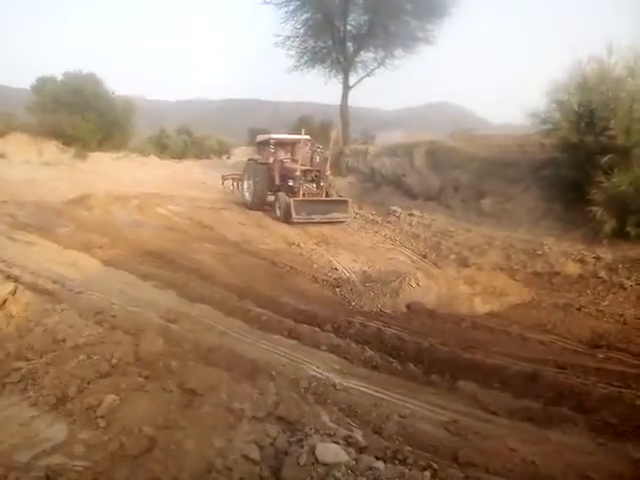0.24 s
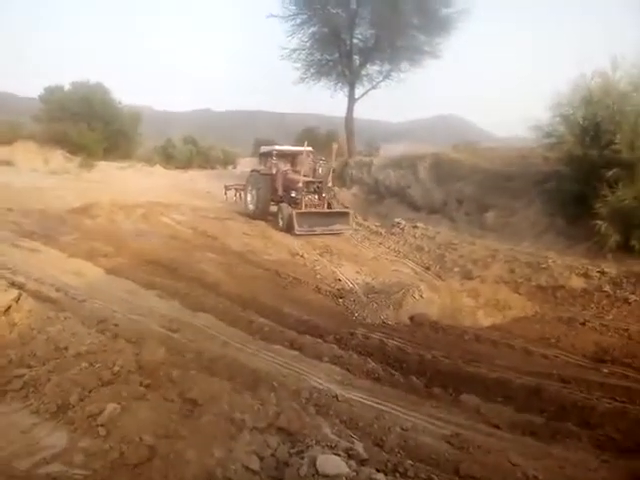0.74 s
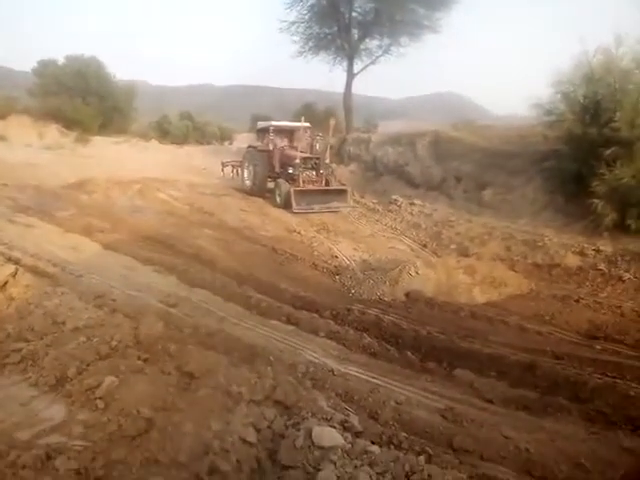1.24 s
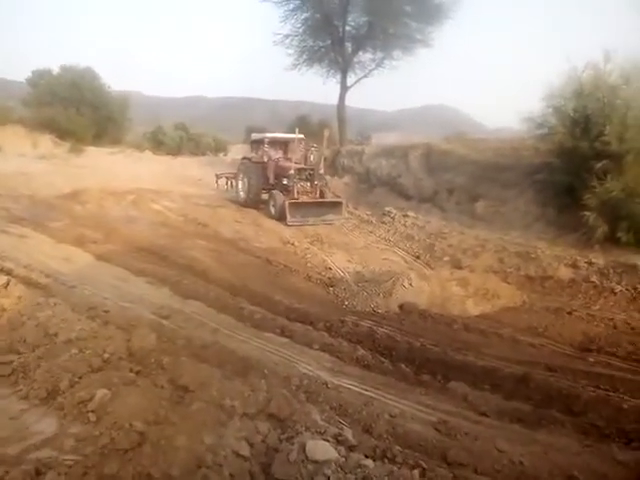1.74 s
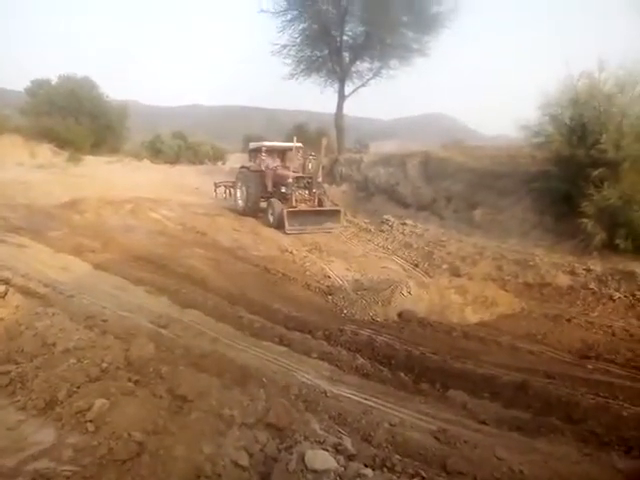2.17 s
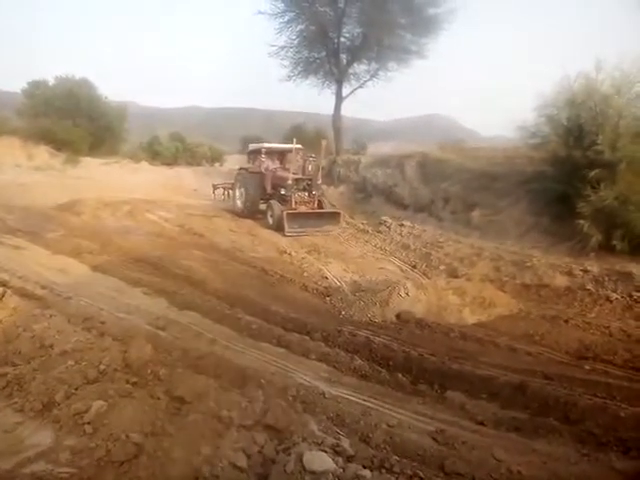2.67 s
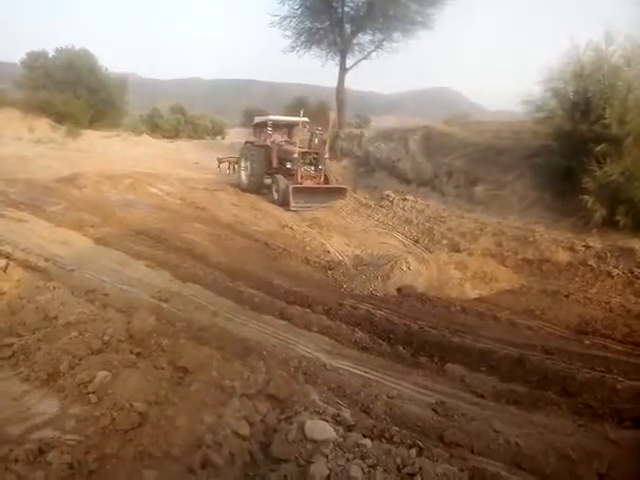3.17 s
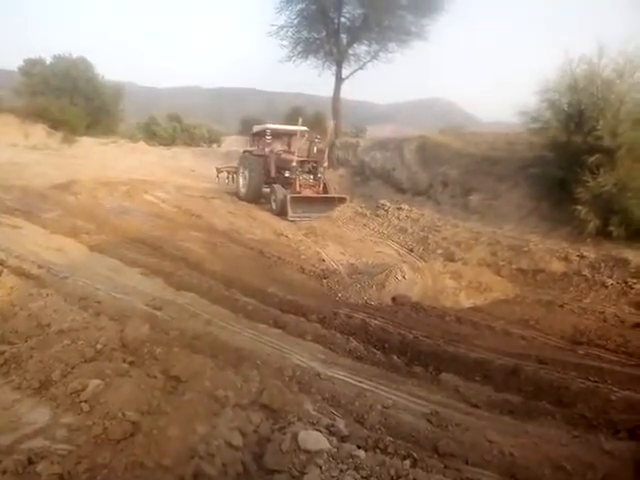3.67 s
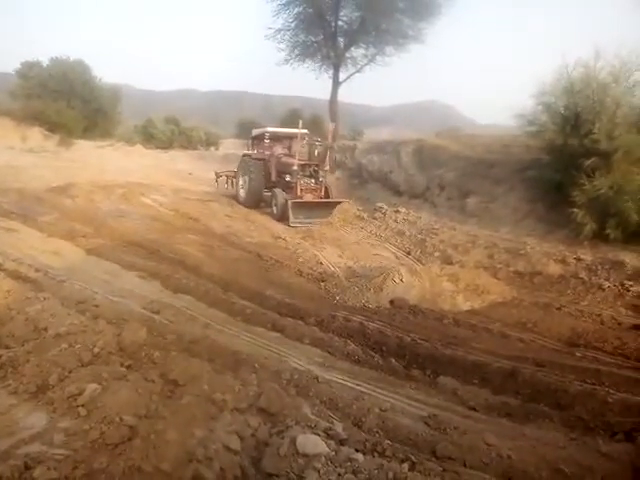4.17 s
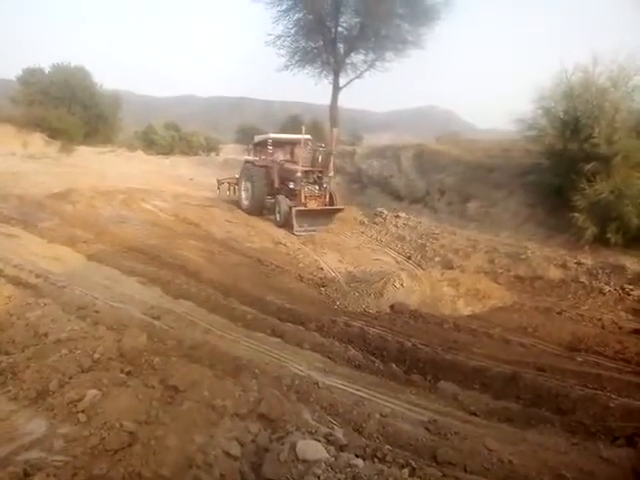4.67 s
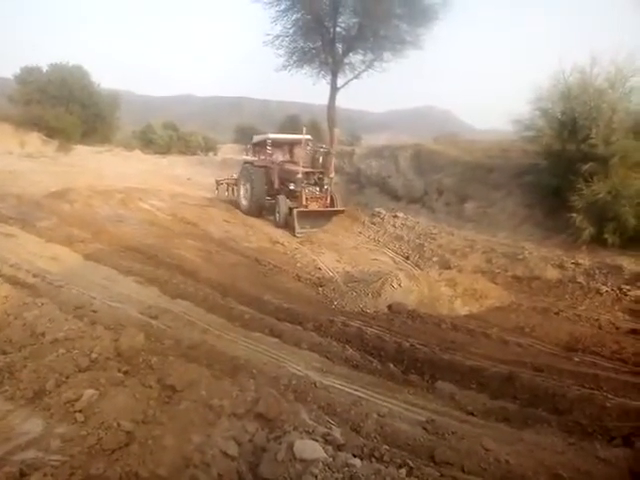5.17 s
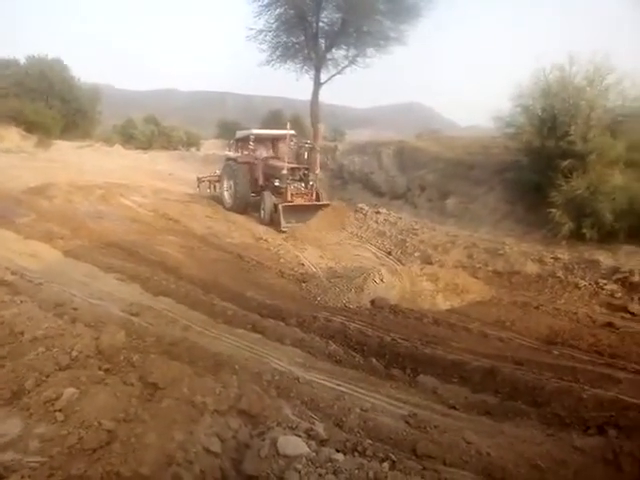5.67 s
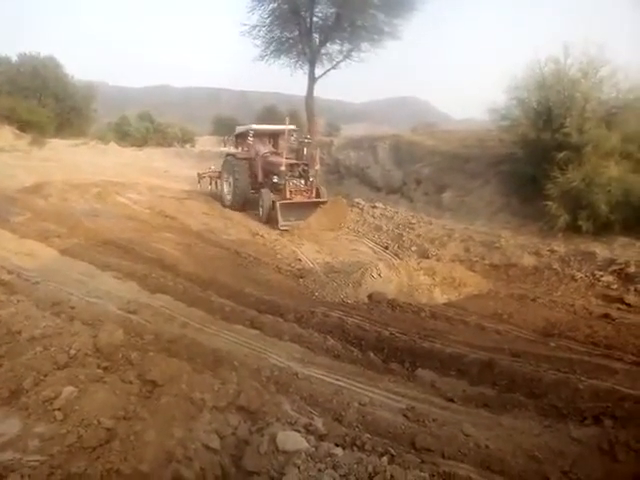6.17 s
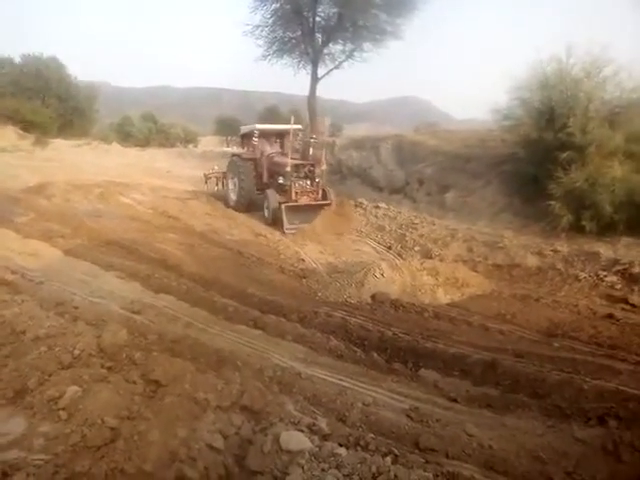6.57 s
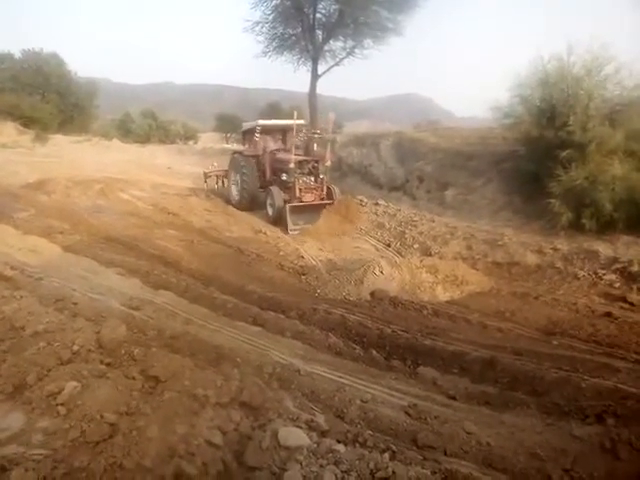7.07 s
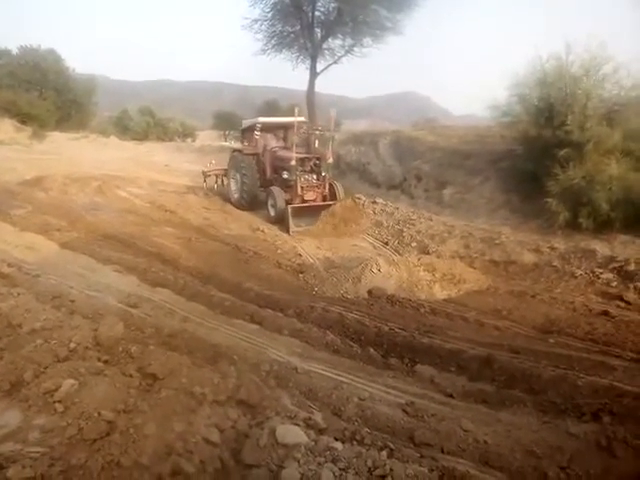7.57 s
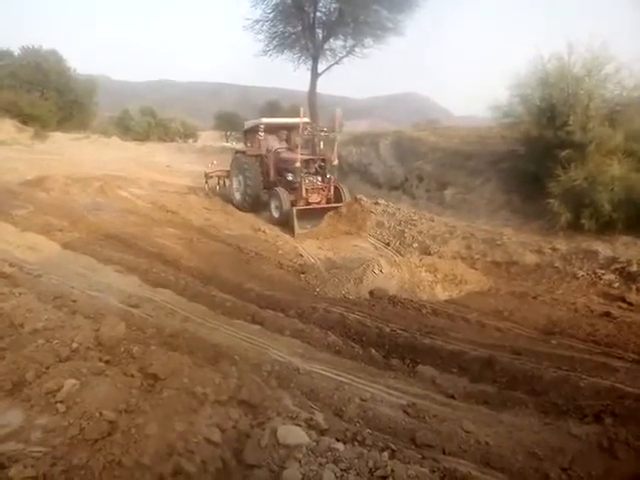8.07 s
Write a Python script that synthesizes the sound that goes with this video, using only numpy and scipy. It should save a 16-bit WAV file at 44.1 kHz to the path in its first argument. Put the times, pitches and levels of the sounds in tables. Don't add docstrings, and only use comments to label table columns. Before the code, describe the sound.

Outdoors in a dry field, a phone microphone hears a tractor's diesel engine throughout: rapid knocking, bright steely clatter, low exhaust boom and thin injector hiss. Revs sag early, recover, then climb in the second half as the machine edges closer and louder. A stone cracks and scrapes near one second; later, scattered linkage clanks, sharp cracks and loose rattling accompany the loaded blade.

```python
import sys
import numpy as np
from scipy import signal
from scipy.fft import rfft, irfft, next_fast_len
from scipy.io import wavfile
from scipy.ndimage import uniform_filter1d

SR = 44100
rng = np.random.default_rng(int(sys.argv[2]) if len(sys.argv) > 2 else 0)


def file_out(sig):
    cols = np.atleast_2d(sig).T
    lim = np.clip(cols, -1, 1)
    pcm = np.round(lim * 32767).astype(np.int16)
    wavfile.write(sys.argv[1], SR, pcm)


def gain_from_db(level_db):
    decades = np.asarray(level_db, float) / 20
    return 10 ** decades


N = 366912

# time_s, firing_rate_hz
FIRING_RATE = [(0.0, 37.42), (0.59, 32.77), (1.31, 28.68), (1.54, 28.94), (2.44, 34.96), (2.89, 31.77),
               (3.52, 32.98), (4.21, 39.2), (4.5, 40.2), (5.0, 37.65), (5.21, 37.92), (5.73, 36.65),
               (6.06, 40.48), (6.52, 40.5), (6.73, 42.33), (7.21, 41.88), (7.52, 43.62), (8.32, 41.83)]
# time_s, block_level_db
BLOCK_LEVEL = [(0, -46.5), (.35, -48.5), (.65, -50.5), (1.2, -50), (1.6, -48), (2.2, -47.5), (2.8, -48.5),
               (3.4, -48), (3.8, -46), (4.1, -43.5), (4.5, -44.5), (5.1, -43), (5.9, -43.5), (6.3, -44.5),
               (6.7, -43), (7.2, -42.5), (7.6, -42), (8.32, -41.5)]
# freq_hz, density_db
BODY = [(15, -17), (45, -23.5), (110, -17), (210, -6), (290, -7), (380, -8.5), (470, -12.5), (680, -7.5),
        (1000, -12), (1180, -8), (1750, -5), (2000, 0), (2600, -5.5), (3400, -13.5)]
# freq_hz, density_db
TREBLE = [(1650, -55), (2800, -4), (3250, -13), (3690, -10), (4050, -10.5), (4710, -8), (5340, 1),
          (5570, 3), (6360, -8), (7820, -30), (9310, -43), (12500, -42), (16200, -66), (22000, -120)]
# freq_hz, t60_s, level_db
BLOCK_MODES = [(1110, .04, -9), (1175, .07, -4), (1235, .05, -5), (1450, .04, -9), (1670, .045, -5),
               (1980, .05, 1.5), (2150, .05, 1.5), (2500, .03, -5), (2900, .03, -8), (5300, .025, -6),
               (5550, .03, -5), (5800, .025, -7)]
# freq_hz, gain_db
CASTING = [(900, 0), (6000, 0), (9000, -25)]
CYLINDERS_DB = [-0.9, 0.6, -0.18, 0.35]
# freq_hz, density_db
TICK_BAND = [(7000, 0), (11000, -10)]
# freq_hz, level_db
SILENCER = [(29, -54), (37, -35), (57, -26.5), (68, -14.5), (77, -19), (90, -20), (106, -24.5),
            (128, -19.5)]
ORDERS_DB = [-1, -0.1, 0.2, -7.5]
# freq_hz, t60_s, level_db
STACK_MODES = [(260, .07, -2), (330, .08, -6), (435, .1, -2), (550, .14, -2.5), (680, .12, -3),
               (850, .1, -2)]
# place_turns, pitch_hz, length_turns, level_db (re block)
VALVE_POPS = [
    (2.29, 515, .17, -3.8),
    (.27, 190, .2, -11),
    (1.22, 1200, .1, -11),
]
# freq_hz, density_db
SPRAY = [(11000, -26), (12800, -19), (13550, -10), (13900, -13), (14600, -1), (14800, 0), (15000, -1),
         (15600, 0)]
SPRAY_EDGES_HZ = [12000, 13300, 13800, 14400, 14900, 15250, 20000]
# middle_s, half_length_s, extra_db
THROTTLE = [
    (.35, 0.31, 3),
    (4.35, 0.7, 3.5),
    (5.9, .25, 2.5),
]
# middle_s, half_length_s, level_db
FAN_SPELLS = [
    (.05, 0.19, -62.5),
    (.7, .2, -69),
    (2.6, 0.22, -69),
    (4.2, 0.36, -70),
    (5.25, 0.1, -57),
    (6.85, 0.69, -56),
]
# middle_s, half_length_s, level_db
GEAR_SPELLS = [
    (.18, .08, -58),
    (3.35, .25, -71),
    (5.3, .4, -67),
    (7.3, .9, -68),
]
GEAR_ORDERS = [34.4, 14, 11, 10.5]
# start_s, peak_db
CLANKS = [(1.7355, -26.5), (2.055, -33), (3.882, -26), (3.99, -21.5), (5.105, -25), (5.551, -21),
          (5.984, -24), (6.523, -38), (7.26, -25), (7.4495, -23), (7.5884, -23), (7.7493, -59), (8.11, -41)]
# start_s, peak_db, length_s, sparkle_db
CRACKS = [
    (.4585, -24, .012, -32),
    (1.365, -26, .007, -37),
    (5.13, -29, .008, -38),
    (5.722, -21.5, .013, -37),
    (5.7415, -22, .01, -40),
]
# freq_hz, density_db
SPARKLE = [(7000, 0), (12000, -12)]
# time_s, level_db
RATTLE = [
    (0, -77.5),
    (4, -59.5),
    (6.3, -56.5),
    (7.5, -49.5),
    (8.32, -54),
]
# freq_hz, t60_s, level_db
PINS = [(2710, 0.023, 3.5), (3030, 0.021, 1.5), (3440, 0.024, -1), (3800, 0.017, -0.5), (4450, 0.02, 0.5)]


def level(x, db):
    return x * gain_from_db(db) / np.sqrt(np.mean(x ** 2))


def seconds():
    return np.arange(N) / SR


def curve(table):
    s, value = np.transpose(table)
    return np.interp(seconds(), s, value)


def response_db(table, hz):
    table_hz, db = np.transpose(table)
    return np.interp(np.log(hz), np.log(table_hz), db)


def colour(x, table, lo_hz, hi_hz):
    size = next_fast_len(N)
    hz = np.arange(size // 2 + 1) * SR / size + 1
    edges = 1 / np.sqrt((1 + (lo_hz / hz) ** 8) * (1 + (hz / hi_hz) ** 8))
    return irfft(rfft(x, size) * gain_from_db(response_db(table, hz)) * edges, size)[:N]


def ring(x, hz, t60_s):
    r = np.exp(-np.log(1000) / (t60_s * SR))
    w = 2 * np.pi * hz / SR
    return signal.lfilter([np.sin(w)], [1, -2 * r * np.cos(w), r * r], x)


def walk(rate_hz):
    k = int(SR / rate_hz)
    held = np.repeat(rng.standard_normal(N // k + 1), k)
    return uniform_filter1d(uniform_filter1d(held, k), k)[:N]


def grit(spread_db):
    return rng.standard_normal(N) * gain_from_db(spread_db * np.minimum(rng.exponential(size=N), 5.5))


def spells(table):
    middle_s, half_s, db = np.transpose(table)[:, :, None]
    return np.exp(-((seconds() - middle_s) / half_s) ** 4), db


def engine(turn):
    block_db = curve(BLOCK_LEVEL)
    nearer_db = block_db - block_db.mean()
    depth = knock_depth()
    chance = rng.standard_normal((int(turn[-1]) + 4, 4)).T
    force_db = np.resize(CYLINDERS_DB, chance.shape[1]) + 1.1 * chance[0]
    bark_db = force_db + 0.93 * chance[1]
    clatter_db = force_db + 1.37 * chance[2]
    spray_db = force_db + 1.57 * chance[2] + 0.8 * chance[3]

    rumble = ground(colour(grit(0.8), BODY, 13, 610))
    roar = grit(0.84) * knocks(turn, force_db, 0.17, 0.22, 0.5, 0.11 * depth)
    roar = colour(roar, BODY, 653, 1514)
    bark = grit(1.26) * knocks(turn, bark_db, 0.16, 0.17, 0.48, 0.46 * depth)
    bark = colour(bark, BODY, 1520, 3700)
    clatter = grit(2.15) * knocks(turn, clatter_db, 0.18, 0.25, 0.38, 0.64 * depth)
    clatter = colour(clatter, TREBLE, 2080, 10800)
    hiss = spray(knocks(turn, spray_db, 0.08, 0.21, 0.3, 0.5 * depth))
    throttle, extra_db = spells(THROTTLE)

    mix = level(block(turn, force_db), -8.5)
    mix += level(rumble, 1.17) * gain_from_db(-13 - 0.1 * nearer_db + 0.9 * walk(5.7))
    mix += level(roar, -5) * gain_from_db(1.3 * walk(5))
    mix += level(bark, -3) * gain_from_db(walk(5))
    mix += level(clatter, -0.21) * gain_from_db(-1.5 - 0.24 * nearer_db)
    mix += level(hiss, 0.2) * gain_from_db(-21.5 + (throttle * extra_db).sum(axis=0))
    mix += stack(turn) + valve_pops(turn) + bonnet(nearer_db)
    mix += ticks(turn, force_db + 3.5 * chance[2])
    return gain_from_db(block_db) * mix


def knock_depth():
    hz = curve(FIRING_RATE)
    mean_s, mid_hz = 2, 37
    sag_hz = uniform_filter1d(hz, int(mean_s * SR), mode="mirror") - hz
    return np.clip(0.64 + 0.061 * sag_hz - 0.0097 * (hz - mid_hz), 0, 1)


def knocks(turn, strengths_db, peak, rise, fall, depth):
    firing = np.round(turn - peak - (fall - rise)).astype(int)
    late = turn - peak - firing
    burst = np.exp(-(late / np.where(late < 0, rise, fall)) ** 2) * gain_from_db(strengths_db[firing + 1])
    return 1 - depth + depth * burst / burst.mean()


def block(turn, strengths_db):
    firing = np.round(turn).astype(int) + 1
    blow = np.exp(-(turn + 1 - firing - 0.09) ** 2 / 0.021) * grit(2.85)
    chance = rng.standard_normal((len(strengths_db), len(BLOCK_MODES)))
    forces_db = strengths_db[:, None] + 2.5 * chance
    rung = 0
    for k, (hz, t60_s, db) in enumerate(BLOCK_MODES):
        rung = rung + gain_from_db(db) * ring(blow * gain_from_db(forces_db[firing, k]), hz, t60_s)
    return colour(rung, CASTING, 900, 6800)


def ticks(turn, strengths_db):
    flash = grit(1.5) * knocks(turn, strengths_db, 0.1, 0.1, 0.2, 1)
    return level(colour(flash, TICK_BAND, 7200, 10500), -36.5)


def ground(x):
    lag = np.linspace(0.00108, 0.0014, N) * SR
    return x + gain_from_db(-7) * np.interp(np.arange(N) - lag, np.arange(N), x)


def stack(turn):
    puffs = np.diff(np.exp(-((turn + 0.5) % 1 - 0.5) ** 2 / 0.00005), prepend=0)
    return level(sum(gain_from_db(db) * ring(puffs, hz, t60_s) for hz, t60_s, db in STACK_MODES), -17)


def valve_pops(turn):
    time = seconds()
    out = np.zeros(N)
    for place, hz, length, db in VALVE_POPS:
        cycle = np.round((turn - place) / 4).astype(int)
        centre = place + 4 * cycle
        chance = rng.standard_normal((N // 3000, 2))[cycle + 1].T
        since_s = time - np.interp(centre, turn, time)
        swell = gain_from_db(db + chance[0]) * np.exp(-((turn - centre) / length) ** 2)
        out += swell * np.sin(2 * np.pi * hz * (1 + 0.01 * chance[1]) * since_s)
    return out


def bonnet(nearer_db):
    hz, t60_s = 1194, 0.021
    drone = ring(ring(grit(0.62), hz, t60_s), hz, t60_s)
    return level(drone, -14) * gain_from_db(0.6 * nearer_db)


def spray(gate):
    noise = rfft(colour(grit(1.5) * gate, SPRAY, 11500, 18400))
    hz = np.arange(len(noise)) * SR / N
    out = 0
    for lo_hz, hi_hz in zip(SPRAY_EDGES_HZ, SPRAY_EDGES_HZ[1:]):
        patch = irfft(noise * (hz >= lo_hz) * (hz < hi_hz), N)
        out = out + gain_from_db(2 * walk(3.54) + 1.5 * walk(15)) * patch
    return out


def order_tone(turn, order, gain):
    phase = 2 * np.pi * order * (turn - 0.35) + 0.34 * walk(11)
    return np.sqrt(2) * gain * gain_from_db(0.8 * walk(12)) * np.cos(phase)


def exhaust(turn):
    coast_db, coast_s = -4, 0.31
    hz = curve(FIRING_RATE)
    effort_db = curve(BLOCK_LEVEL) + coast_db * np.exp(-(seconds() / coast_s) ** 2)
    out = 0
    for order, db in enumerate(ORDERS_DB, 1):
        gain = gain_from_db(effort_db + db + response_db(SILENCER, order * hz))
        out = out + order_tone(turn, order, gain)
    return out


def fan(turn):
    swell, db = spells(FAN_SPELLS)
    return order_tone(turn, 5.12, gain_from_db(-78.5) + (swell * gain_from_db(db)).sum(axis=0))


def gears(turn):
    swell, db = spells(GEAR_SPELLS)
    tones = np.sin(2 * np.pi * np.outer(GEAR_ORDERS, turn) + 0.6 * walk(8))
    return np.sqrt(2) * (swell * gain_from_db(db + 2.5 * walk(6)) * tones).sum(axis=0)


def clanks():
    clank_s, clank_sparkle_db, attack_s = 0.011, -46, 0.0015
    hits = [(*row, clank_s, clank_sparkle_db) for row in CLANKS] + list(CRACKS)
    shake, sparkle = np.zeros(N), np.zeros(N)
    for start_s, db, length_s, sparkle_db in hits:
        age = np.clip(seconds() - start_s, 0, 1)
        swell = gain_from_db(db) * np.minimum(age / attack_s, 1) * np.exp(-(age / length_s) ** 2)
        shake += swell
        sparkle += swell * gain_from_db(sparkle_db)
    mid = level(colour(grit(1.5), BODY, 900, 3200), -19)
    top = level(colour(grit(1.5), TREBLE, 3200, 12000), -16)
    air = level(colour(grit(1.5), SPARKLE, 7000, 12000), -8)
    return shake * (mid + top) + sparkle * air


def scrape():
    start_s, attack_s, hold_s, release_s = 1.362, 0.006, 0.085, 0.025
    age = np.clip(seconds() - start_s, 0, 1)
    release = np.exp(-(np.maximum(age - hold_s, 0) / release_s) ** 2)
    grind = gain_from_db(-44) * np.minimum(age / attack_s, 1) * release
    stones = grit(1.8)
    rub = level(colour(stones, BODY, 820, 3200), -4)
    rub += level(colour(stones, TREBLE, 3200, 12000), -5)
    rub += level(ring(stones, 735, 0.04) + ring(stones, 810, 0.05), -4.5)
    rub += level(ring(stones, 1010, 0.04) + ring(stones, 1280, 0.04), -10)
    plate = level(ring(grind * stones, 2600, 0.35), -73.5)
    return grind * rub + plate


def thud():
    start_s, pitch_hz, attack_s, decay_s = 8.17, 207, 0.023, 0.049
    age = np.clip(seconds() - start_s, 0, 1)
    swell = np.minimum(age / attack_s, 1) * np.exp(-age / decay_s)
    return gain_from_db(-39.5) * np.sin(2 * np.pi * pitch_hz * age) * swell


def rattle():
    rate_hz = 45
    taps = (rng.random((len(PINS), N)) < rate_hz / SR) * rng.uniform(-1, 1, N)
    rung = sum(gain_from_db(db) * ring(tap, hz, t60_s) for tap, (hz, t60_s, db) in zip(taps, PINS))
    return gain_from_db(curve(RATTLE)) * level(rung, 0)


def scene():
    start_turn = -0.28
    turn = np.cumsum(curve(FIRING_RATE)) / SR + start_turn
    tractor = engine(turn) + exhaust(turn) + fan(turn) + gears(turn)
    blade = clanks() + scrape() + thud()
    return (tractor + blade + rattle())[None]


def low_pass(x):
    return signal.sosfilt(signal.butter(12, 16870, fs=SR, output="sos"), x)


def record(dry):
    whine_hz, top_hz = 12898, 15540
    hiss = level(rng.standard_normal(dry.shape), -75)
    whine = np.sqrt(2) * gain_from_db(-97) * np.sin(2 * np.pi * whine_hz * seconds())
    passed = np.arange(N // 2 + 1) * SR / N < top_hz
    mix = irfft(rfft(dry + hiss + whine) * passed, N)
    return low_pass(mix)


dry = scene()
out = record(dry)
file_out(out)
```